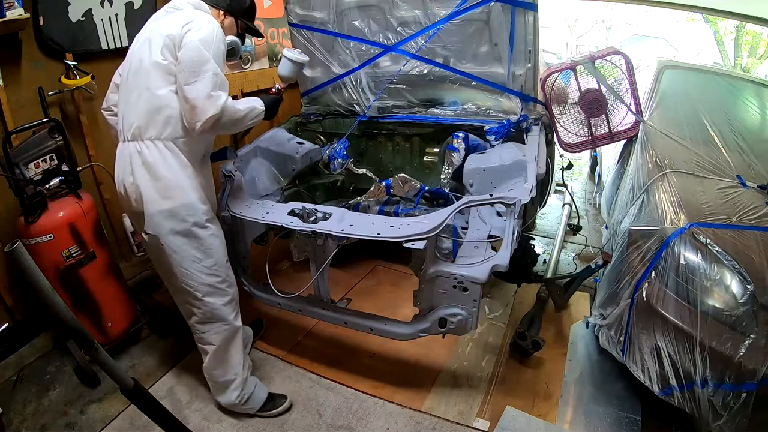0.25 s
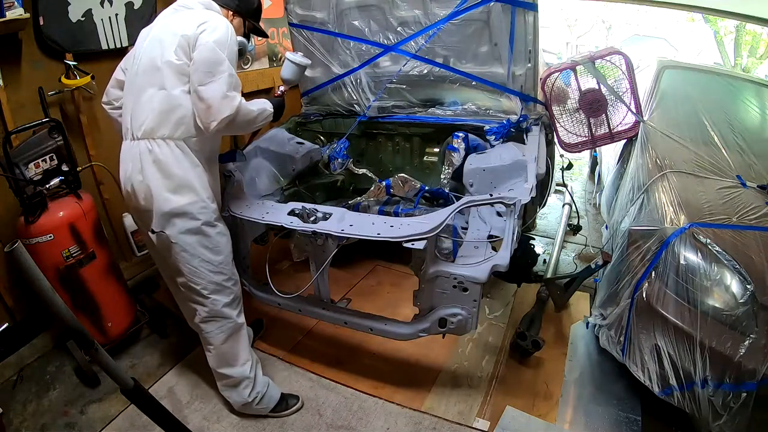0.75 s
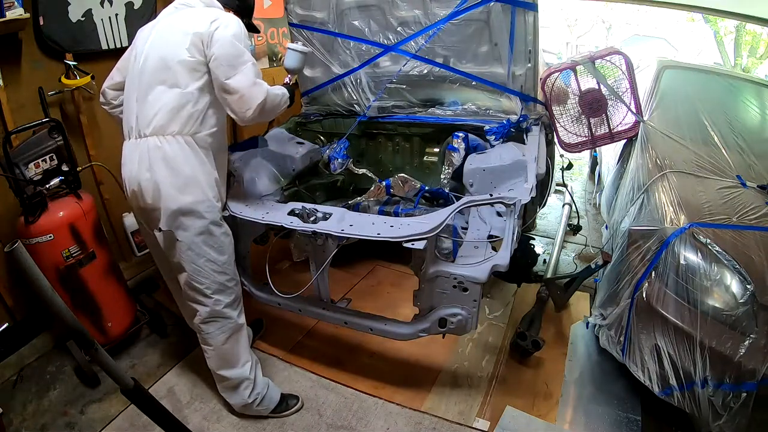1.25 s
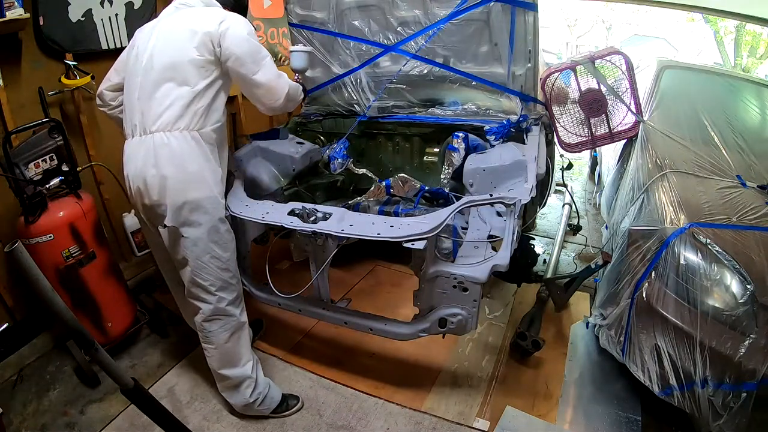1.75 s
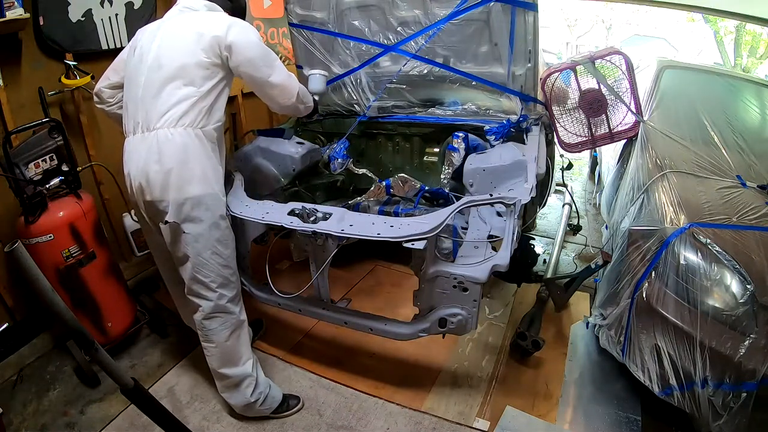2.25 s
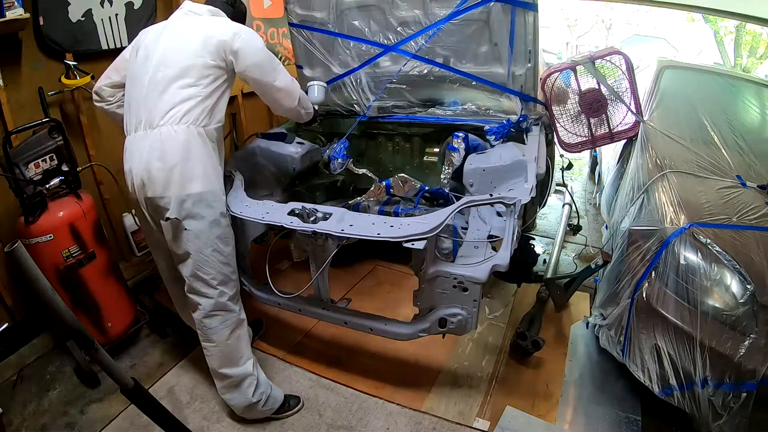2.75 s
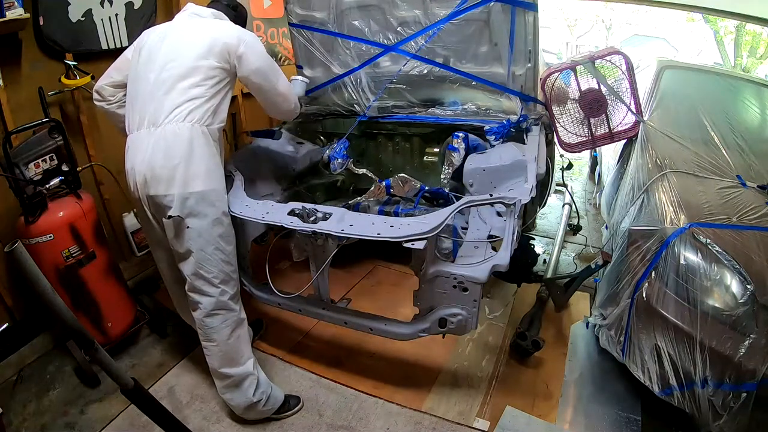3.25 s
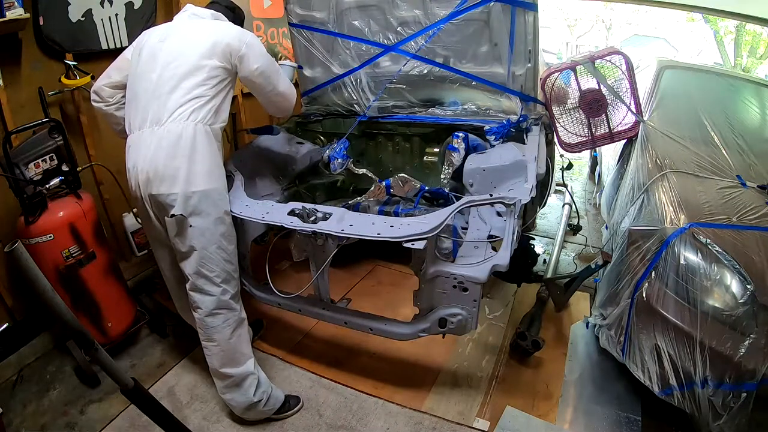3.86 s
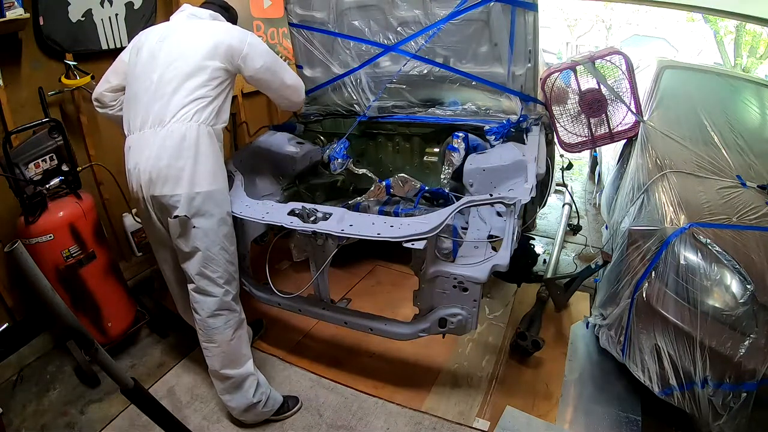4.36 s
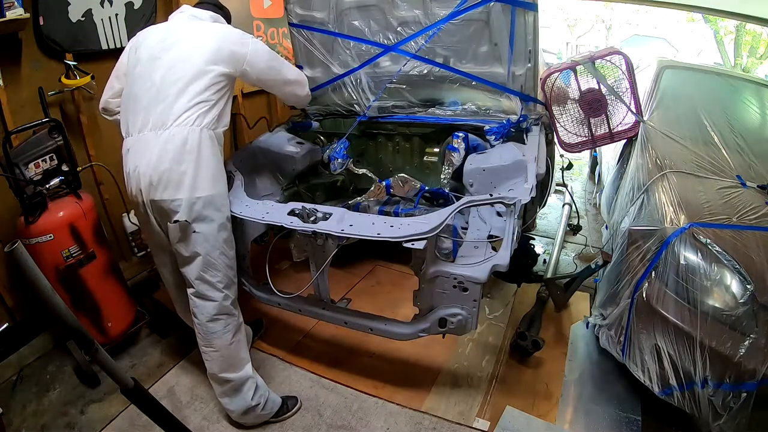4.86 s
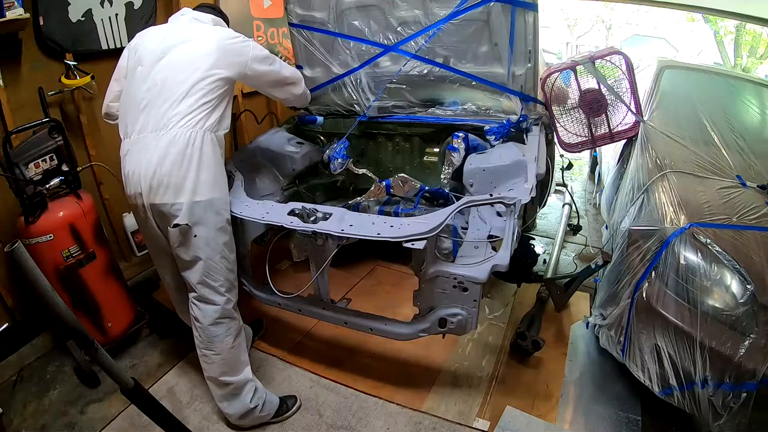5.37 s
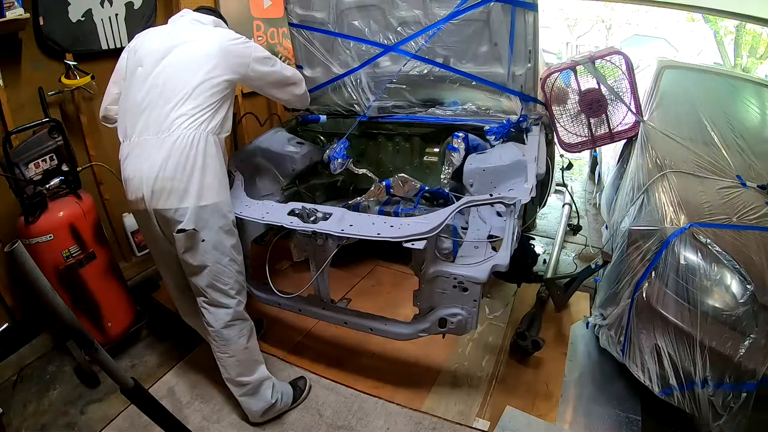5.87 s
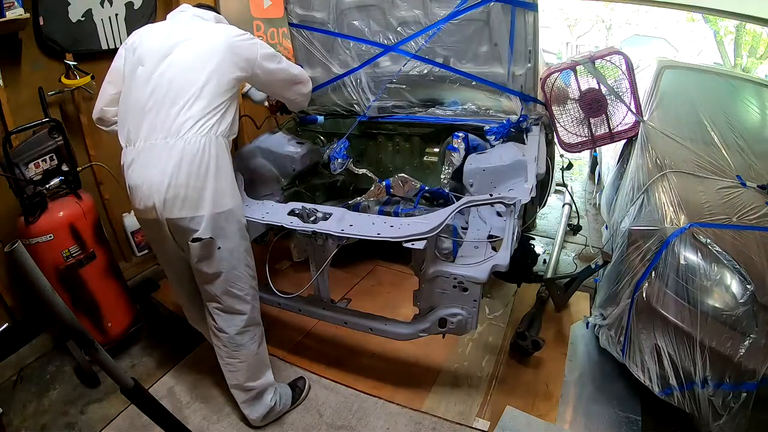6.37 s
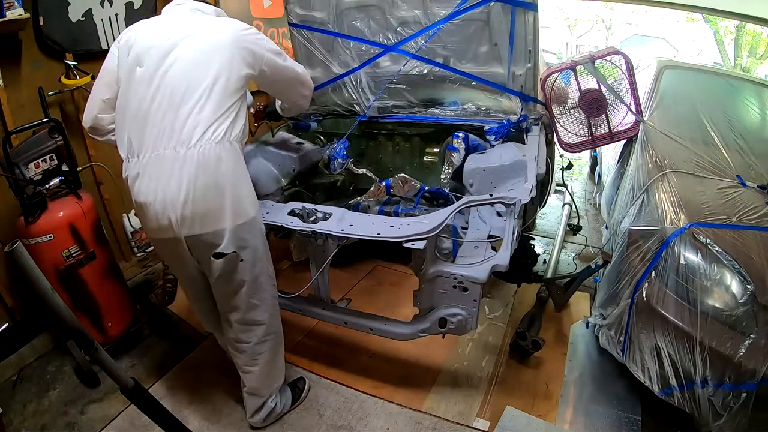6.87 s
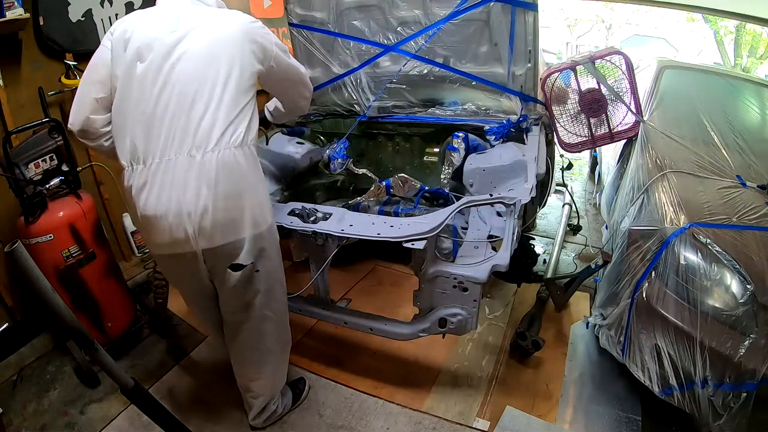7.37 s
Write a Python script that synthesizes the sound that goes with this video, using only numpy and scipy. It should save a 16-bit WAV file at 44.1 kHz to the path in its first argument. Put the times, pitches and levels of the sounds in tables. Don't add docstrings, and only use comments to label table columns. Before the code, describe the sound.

Close stereo microphone on a stand near a running air compressor: an even, harsh, low motor hum fills everything. Spray jets hiss briefly, then longer, then in a fading surge, and faintly at the end. Midway a nearby body partly covers and reflects the drone; dull footfalls swing the stand. Finally a hand hits the microphone housing, the hum ducks and sound stops.

```python
import sys
import numpy as np
from scipy import signal
from scipy.fft import irfft
from scipy.io import wavfile
from scipy.ndimage import map_coordinates

SR = 44100
rng = np.random.default_rng(int(sys.argv[2]) if len(sys.argv) > 2 else 0)


def generate_wav(signal):
    frames = np.transpose(np.atleast_2d(signal))
    scaled = np.clip(frames, -1, 1) * 32767
    pcm = np.round(scaled).astype(np.int16)
    wavfile.write(sys.argv[1], SR, pcm)


def gain_from_decibels(decibels):
    exponent = np.asarray(decibels, float) / 20
    return 10 ** exponent


N = 336038

# t/s, rate/(turns per s)
SPEED = [(0, 58.003), (2.2, 58.006), (3.6, 58.03), (5.5, 58.045), (7.7, 58.068)]
# t/s, level/dB, fade/s, log time a swing, early fall per log time
KNOCK = [
    (7.5347, 0, .011, 1.08, .15),
    (7.5347, -1, .011, 1.0, .3),
]


def amp_of(points, hz):
    return np.interp(np.log(hz), np.log(np.array(points)[:, 0]), np.array(points)[:, 1])


def rms_one(x):
    return x / np.sqrt(np.mean(x ** 2) + 1e-20)


def drift(rate):
    r = np.exp(-80 * np.pi * rate / SR)
    slow = signal.lfilter([1], [1, -2 * r, r * r], rng.standard_normal(N // 40 + 2002))[2000:]
    return np.interp(np.arange(N) / 40, np.arange(len(slow)), rms_one(slow))


def fits(rows):
    t = np.arange(N) / SR
    return sum(db * np.exp(-((t - s) / half) ** 2) for s, half, db in rows)


def puff(turns, at, depth):
    return np.exp(depth * np.cos(2 * np.pi * (turns - at)))


def whistles(modes, mid_share, fits_db):
    out = 0
    for hz, width_hz, db in modes:
        r = np.exp(-np.pi * width_hz / SR)
        tone = rng.standard_normal((2, N))
        for stage in range(2):
            tone = signal.lfilter([1, 0, -1], [1, -2 * r * np.cos(2 * np.pi * hz / SR), r * r], tone)
        mid, side = rms_one(tone) * gain_from_decibels(db + fits_db * drift(10.0))
        out = out + mid_share * mid + side * [[1], [-1]]
    return rms_one(out)


def bands(spectrum, alike, patchy_db):
    out = 0
    together = drift(4.7)
    edges = np.geomspace(spectrum[0][0], spectrum[-1][0], 22)
    white = rng.standard_normal((2, 2, N))
    for k, (low, high) in enumerate(zip(edges, edges[1:])):
        band = signal.butter(2, [low, high], "band", fs=SR, output="sos")
        mid, side = signal.sosfilt(band, white[k % 2])
        hz = np.sqrt(low * high)
        c = np.clip(amp_of(alike, hz), -1, 1)
        gain = gain_from_decibels(amp_of(spectrum, hz) + patchy_db * (0.99 * together + drift(6.3)))
        out = out + gain * (np.sqrt(1 + c) * mid + np.sqrt(1 - c) * side * [[1], [-1]])
    return rms_one(out)


def unsteady(rows, columns, keep):
    keep = np.clip(keep, 0, .98)
    shape = (rows + 100, columns)
    draw = rng.standard_normal(shape) + 1j * rng.standard_normal(shape)
    return signal.lfilter([np.sqrt((1 - keep ** 2) / 2)], [1, -keep], draw, axis=0)[100:]


def stroke_levels(hz):
    # multiple, left level/dB, right level/dB
    harmonics = [(1, -23.9, -24.8), (2, -32.2, -31.2), (3, -27.3, -27.0), (4, -27.0, -26.8), (5, -35.5, -36.0),
                 (6, -28.9, -29.0), (7, -35.7, -36.6), (8, -37.7, -39.1), (9, -25.2, -25.2),
                 (10, -20.7, -23.5), (11, -24.8, -29.6), (12, -31.0, -29.8), (13, -28.5, -34.0),
                 (14, -30.9, -35.9), (15, -35.4, -36.4), (16, -36.4, -44.4), (17, -40.4, -46.7),
                 (18, -45.1, -51.5), (19, -48.3, -49.7), (20, -56.8, -55.0),
                 (21, -51.0, -54.7), (22, -42.1, -49.9), (23, -38.6, -49.1), (24, -49.3, -47.6),
              (25, -42.6, -47.3), (26, -40.6, -56.2), (27, -51.1, -53.8), (28, -46.1, -47.9),
              (29, -50.6, -59.7), (30, -50.8, -52.9), (31, -39.2, -46.4), (32, -45.3, -53.2),
              (33, -55.4, -62.4), (34, -45.4, -46.5), (35, -53.9, -61.2), (36, -50.4, -52.1),
              (37, -50.6, -58.2), (38, -41.1, -47.4), (39, -40.8, -47.8), (40, -54.2, -62.3)]
    # f/Hz, level/dB
    upper = [(2350, -65), (4000, -68), (5000, -70), (6500, -77)]
    # multiple, level/dB
    resonant = [(41, -53.0), (45, -51.0), (46, -56.0), (47, -57.0), (49, -58.0), (50, -56.0), (52, -56.0),
                (55, -58.0), (56, -60.0), (57, -58.0), (59, -54.0), (60, -58.0), (63, -56.0), (64, -55.0),
                (65, -61.0), (68, -60.0), (69, -59.0), (73, -61.0), (77, -57.0), (78, -64.0), (79, -61.0),
                (80, -63.0), (81, -59.0), (83, -66.0), (85, -64.0), (92, -66.0)]
    # multiple, level/dB
    half_lines = [(9.5, -53), (15.5, -54), (19.5, -61), (21.5, -60), (31.5, -57), (32.5, -54), (34.5, -59),
                  (35.5, -60), (36.5, -56), (46.5, -60)]
    db = amp_of(upper, hz) + 1.0 * rng.standard_normal((2, len(hz)))
    db[:, ::2] = -120
    for multiple, *ports in harmonics:
        db[:, 2 * int(multiple) - 1] = ports
    for multiple, line_db in resonant:
        db[:, 2 * int(multiple) - 1] = line_db + np.array([2.5, -.5])
    for multiple, half_db in half_lines:
        db[:, int(2 * multiple) - 1] = half_db + np.array([1.5, -1.5])
    return db


def stroke_phases(k, hz, smear):
    # f/Hz, width/Hz, stages
    cavities = [(120, 35, 2), (522, 25, 2), (610, 40, 1), (640, 60, -1), (1165, 40, 1)]
    # f/Hz, phase/rad
    left_lead = [(60, -.1), (230, 0), (400, .15), (600, .35), (700, 1.0), (900, 1.1), (1300, .6),
                 (1800, -.5)]
    lag = sum(n * np.arctan2(hz * width, centre ** 2 - hz ** 2) for centre, width, n in cavities)
    capsule_lead = 3 * np.arctan(50 / hz) + .9 * (58 / hz) ** 4
    phase = capsule_lead - lag - .05 * k
    phase = phase + np.where(hz < 1550, .4, 1) * smear * rng.standard_normal(len(hz))
    apart = amp_of(left_lead, hz) + np.clip(smear, 0, .9) * rng.standard_normal(len(hz))
    return phase - [[0], [1]] * apart


def walker(when, k, hz, smear):
    # t/s, detour of the echo/ms, echo strength 0-1, cover of the path 0-1
    walk = [(2.3, 6.3, 0, 0), (2.9, 6.33, .15, .22), (3.4, 8.86, .3, .42), (3.9, 11.44, .6, .15),
            (4.15, 12.07, .7, .45), (4.35, 11.88, .8, 1), (5, 11.97, .1, .62), (5.6, 12.05, .5, .86),
            (5.85, 11.98, 1, 1), (6.05, 12.2, .4, .2), (6.3, 13.81, .2, .2), (6.6, 14.02, .9, .5),
            (7.5, 13.91, .4, .35)]
    # multiple, at rest/dB, echo/dB, covered/dB
    body = [(3, -.2, .4, .6), (4, -.1, 1.6, .3), (5, -.3, -3.2, -.5), (6, -.5, 2, .4), (7, -2.5, -7, 8),
            (8, -1.2, 0, 1.5), (9, 0, 6, 0), (10, -.2, -.4, .9), (11, 1.5, -2, -7.5), (12, .1, 3.6, -2.5),
            (13, 1.8, -2.7, -2.1), (14, -4.5, 2, 7.5), (15, 1.5, 5, -6), (16, -.4, -2.6, 4.2),
            (17, -3.4, .5, 6.5), (18, -2, 3, 6.3), (38, 0, 0, 3), (39, 0, 0, 3.5)]
    s, *columns = np.transpose(walk)
    detour_ms, echo, covered = (np.interp(when, s, column) for column in columns)
    shade = np.ones((len(when), len(hz)))
    for multiple, rest_db, echo_db, covered_db in body:
        beat = np.cos(2 * np.pi * multiple * SPEED[2][1] * detour_ms / 1000)
        shade[:, 2 * int(multiple) - 1] = gain_from_decibels(rest_db + echo_db * echo * beat + covered_db * covered)
    odds = rng.standard_normal((2, 2, len(hz)))
    cycles = hz * detour_ms[:, None] / 1000 + odds[0][:, None]
    swept = .3 * (k > 18) * echo[:, None] * np.exp(2j * np.pi * cycles)
    scramble = np.clip(smear + .2, 0, 1) * covered[:, None] * (odds[1, 0] + .4 * odds[1][:, None])
    return shade, (1 + swept) * np.exp(1.3j * scramble)


def pump(turns):
    # f/Hz, share
    wander = [(60, .03), (400, .05), (600, .04), (900, .05), (1500, .09), (2200, .12), (6000, .3)]
    # multiple, beats/(1/s), first peak t/s, depth
    slip_beat = (31, 3.9, .05, .35)
    # multiple, t/s, half length/s, level/dB
    ring_up = (34, 6.16, .07, 9)
    size, top = 4096, 220
    k = np.arange(1, top + 1) / 2
    hz = k * SPEED[0][1]
    smear = np.clip((hz - 700) / 900, 0, 3)
    db = stroke_levels(hz)
    phase = stroke_phases(k, hz, smear)
    rows = int(turns[-1] / 2) + 2
    when = np.arange(rows) * 2 / SPEED[2][1]
    shade, scatter = walker(when, k, hz, smear)
    multiple, beats, first, depth = slip_beat
    shade[:, 2 * int(multiple) - 1] = 1 + depth * np.cos(2 * np.pi * beats * (when - first))
    multiple, at, half, rise_db = ring_up
    shade[:, 2 * int(multiple) - 1] = gain_from_decibels(rise_db * np.exp(-((when - at) / half) ** 2))
    share = np.where(k % 1, 1.5, amp_of(wander, hz))
    common = unsteady(rows, top, 0.84) + 0.32 * unsteady(rows, top, 0.69)
    out = []
    for port in range(2):
        chance = .9 * common + .4 * unsteady(rows, top, .9)
        gain = scatter[port] * shade ** (.85 + .5 * port) * (1 + share * chance) / np.sqrt(1 + share ** 2)
        lines = np.sqrt(2) * gain_from_decibels(db[port]) * np.exp(1j * phase[port]) * gain
        periods = irfft(np.pad(lines, ((0, 0), (1, 0))), size, axis=1) * size / 2
        periods = np.hstack([periods, periods[:, :1]])
        out.append(map_coordinates(periods, [turns / 2, turns / 2 % 1 * size], order=1))
    return np.array(out)


def valves(turns):
    # f/Hz, width/Hz, level/dB
    reed_modes = [(6300, 100, -13.5), (7210, 200, -7), (9040, 200, -5.5), (9170, 57, -6), (9400, 110, -7),
                  (9580, 200, -5), (10130, 380, -12.5), (12000, 1200, -19.5), (14500, 800, -22)]
    # t/s, half length/s, change/dB
    squeal_fits = [(3.73, .02, -2), (4.09, 0.091, 3.5), (4.21, .05, -3), (4.58, .03, -6), (4.77, 0.025, -1),
                   (5.86, .03, -1), (6.12, 0.058, 5), (6.4, 0.12, -2.5), (7.02, 0.065, 2.5),
                   (7.085, .015, -8), (7.15, 0.14, 8), (7.4, .05, 0), (7.53, .06, 7.5)]
    puffs = puff(turns, .35, .5) * puff(2 * turns, .5, .25)
    held = gain_from_decibels(-55 + fits(squeal_fits) - 0.5 * drift(7))
    return rms_one(whistles(reed_modes, 0.62, fits_db=1.0) * puffs) * held * gain_from_decibels(np.array([[9], [11]]))


def intake_rush(turns):
    # f/Hz, level/(dB per Hz)
    rush_spectrum = [(20, -10), (60, -4), (300, -6), (550, -4), (800, -9.5), (1100, -9.5), (1500, -9),
                     (2050, -10.5), (2500, -22), (3600, -17), (5500, -24), (8000, -17.5), (10500, -27),
                     (15000, -37)]
    # f/Hz, coherence
    rush_alike = [(60, 0.98), (640, 0.88), (1400, 0.094), (3100, 1), (6800, -0.45), (15000, 0.15)]
    flow = bands(rush_spectrum, rush_alike, patchy_db=.9) * puff(turns, .1, .1)
    return gain_from_decibels(-35) * flow * gain_from_decibels(np.array([[.6], [-.6]]))


def thinned_air(air):
    for dip_hz, sharpness in [(10850, 6), (13400, 7)]:
        air = air - 0.87 * signal.lfilter(*signal.iirpeak(dip_hz, sharpness, fs=SR), air)
    return air


def cover(turns):
    # f/Hz, width/Hz, level/dB
    cover_modes = [(1833, 46, -4.5), (2047, 83, -3), (2085, 66, -2), (2630, 250, -10), (3465, 530, -8)]
    # t/s, half length/s, change/dB
    rattle_fits = [(0, 0.25, 3.5), (.95, 0.13, -1), (4.1, 0.35, 1.5), (4.7, .2, -12), (6.16, 0.17, 1.5)]
    buzz = whistles(cover_modes, 2.5, fits_db=1.5) * puff(3 * turns, .2, .4)
    return buzz * gain_from_decibels(-39 + fits(rattle_fits)) * gain_from_decibels(np.array([[-1.5], [-5]]))


def trigger(s, held, db, surge_db):
    open_s, surge_s, swell_db_s, close_db_s = 0.021, 0.12, 0.5, 233
    age = np.arange(N) / SR - s
    opened = np.clip(age / open_s, 0, 1) ** 2
    settle_db = surge_db * np.exp(-(np.maximum(age - open_s, 0) / surge_s) ** 2.1)
    swell_db = swell_db_s * (age - held / 2)
    fall_db = (close_db_s + swell_db_s) * np.maximum(age - held, 0)
    return opened * gain_from_decibels(db + settle_db + swell_db - fall_db)


def gun():
    # t/s, held/s, level/dB, first surge/dB
    pulls = [
        (-.2, .44, -56, 8),
        (.51, 1.29, -53, 7),
        (4.795, .77, -59.5, 10.5),
        (6.98, .7, -66, -6),
    ]
    # f/Hz, level/(dB per Hz)
    jet_spectrum = [(1500, 2), (3000, 4.5), (4500, 1.5), (6500, 7), (8500, 4), (11000, 2.5), (13500, -8),
                    (15500, -19.5)]
    jet = bands(jet_spectrum, [(1500, 0.4), (15000, .2)], patchy_db=0.5)
    return jet * sum(trigger(*pull) for pull in pulls) * gain_from_decibels(11.5)


def stand():
    # t/s, level/dB, left-right/dB, f/Hz, t60/s
    shudders = [
        (3.94, -32, 5, 27, .45),
        (6.24, -35, -2, 27, .6),
        (6.9, -31, 4, 26, .5),
        (7.06, -38, -6, 35, .3),
        (7.35, -35, -3, 25, .4),
        (7.41, -28, -12, 25, .4),
        (7.471, -12, 14, 28, .18),
    ]
    out, t = np.zeros((2, N)), np.arange(N) / SR
    for s, db, pan_db, hz, t60 in shudders:
        age = np.maximum(t - s, 0)
        onset = 1 - np.exp(-age / 0.018)
        swing = -np.sin(2 * np.pi * hz * age) * onset * gain_from_decibels(db + 4.0 - 60 * age / t60)
        out += swing * gain_from_decibels(np.array([[pan_db], [-pan_db]]) / 2)
    return out


def knock():
    out = []
    for sign, (s, db, fade, swing, fall) in zip([1, -1], KNOCK):
        age = np.arange(N) / SR - s
        late = np.maximum(age, 0)
        log_time = np.log1p(late / .00025)
        wave = np.cos(np.pi * log_time / swing) * np.exp(-late / fade - fall * log_time)
        out.append(sign * gain_from_decibels(db) * wave * np.exp(np.minimum(age, 0) / .00015))
    return np.array(out)


def limiter_duck():
    duck_db, back_db_s = -24.5, 294
    age = np.arange(N) / SR - KNOCK[0][0]
    return np.where(age > 0, gain_from_decibels(np.minimum(duck_db + back_db_s * age, 0)), 1)


def scene():
    t = np.arange(N) / SR
    first_turn = .511
    turns = first_turn + np.cumsum(np.interp(t, *np.transpose(SPEED))) / SR
    air = thinned_air(intake_rush(turns) + valves(turns))
    garage = pump(turns) + cover(turns) + air + gun() + stand()
    garage = signal.sosfilt(signal.butter(14, 14950, fs=SR, output="sos"), garage)
    return garage * limiter_duck() + knock()


def top_cut(x):
    return signal.sosfilt(signal.butter(12, 15710, fs=SR, output="sos"), x)


def record(dry):
    cut_s, residue_db = 7.5722, -87
    gate = np.clip((cut_s - np.arange(N) / SR) / .0008, 0, 1)
    dull = signal.lfilter([1], [1, -.93], rng.standard_normal((2, N)))
    mix = np.clip(dry, -.98, .98) * gate + gain_from_decibels(residue_db) * rms_one(dull)
    return top_cut(mix)


dry = scene()
out = record(dry)
generate_wav(out)
```